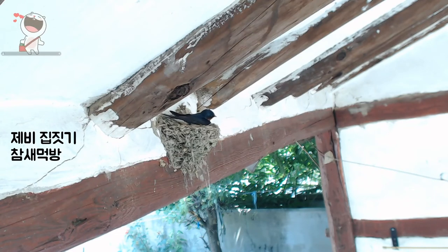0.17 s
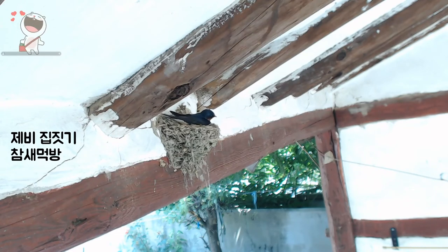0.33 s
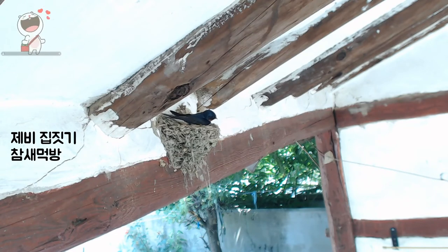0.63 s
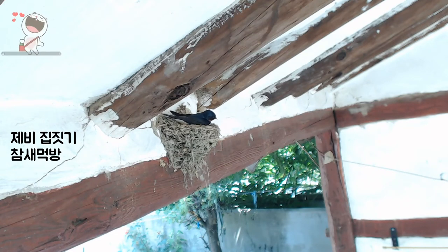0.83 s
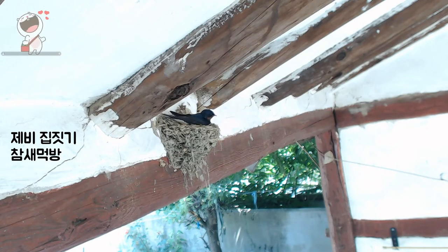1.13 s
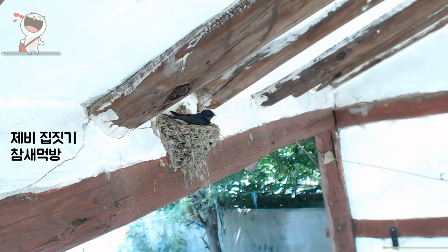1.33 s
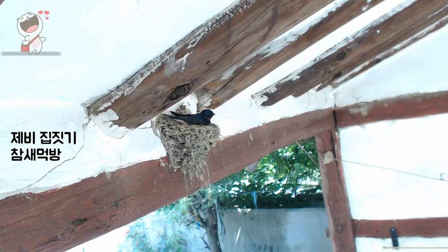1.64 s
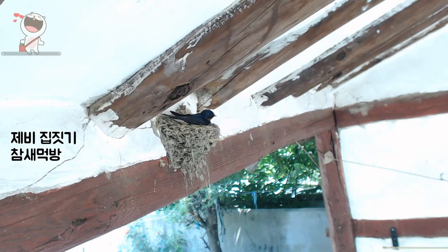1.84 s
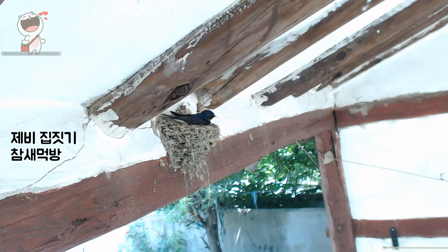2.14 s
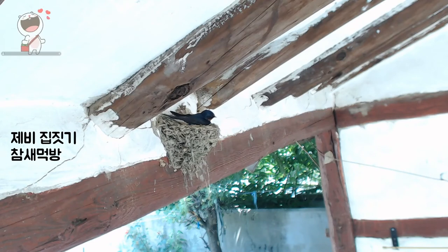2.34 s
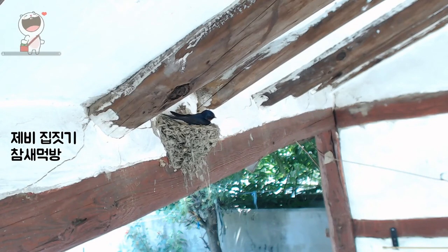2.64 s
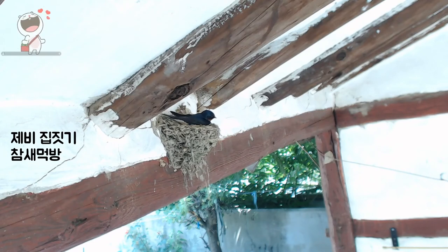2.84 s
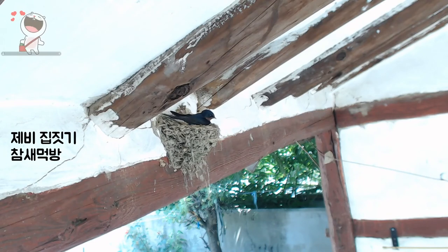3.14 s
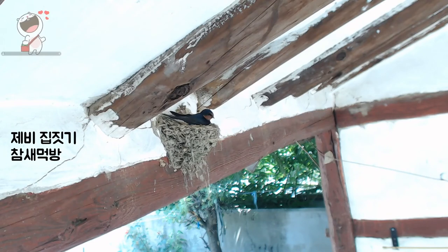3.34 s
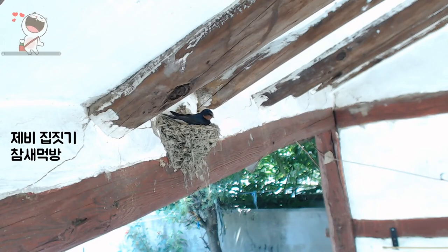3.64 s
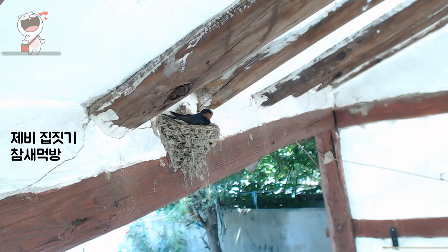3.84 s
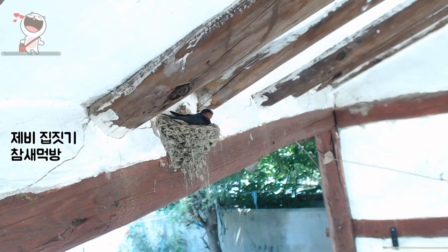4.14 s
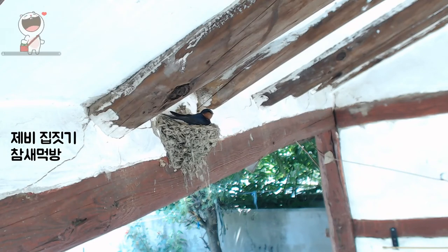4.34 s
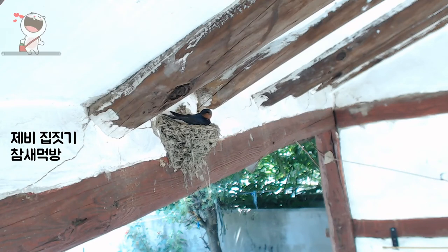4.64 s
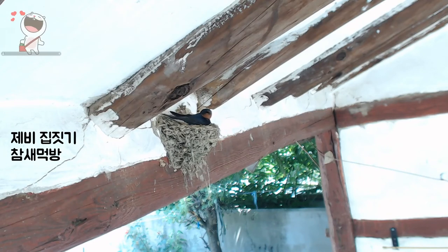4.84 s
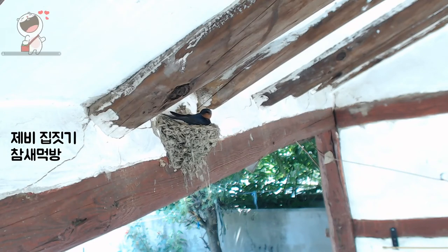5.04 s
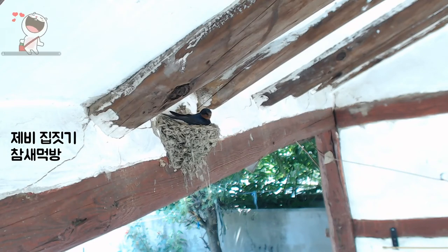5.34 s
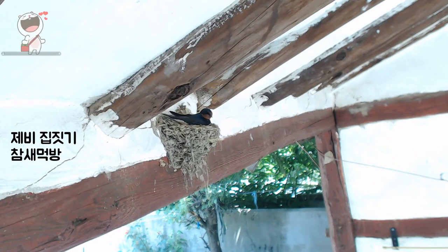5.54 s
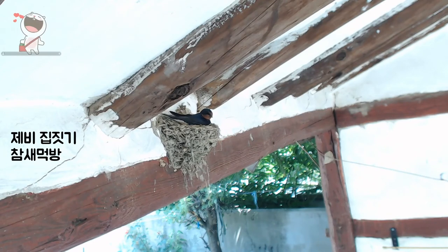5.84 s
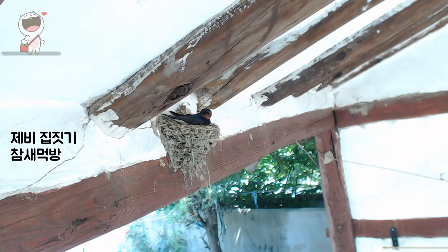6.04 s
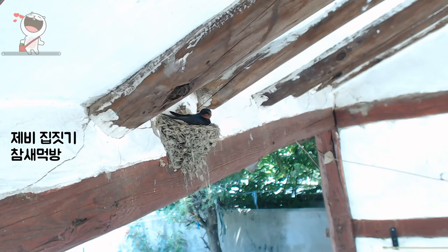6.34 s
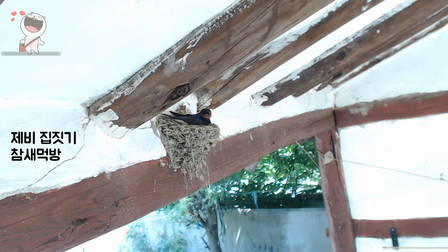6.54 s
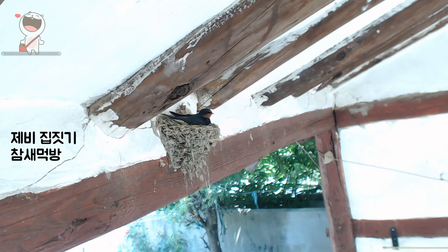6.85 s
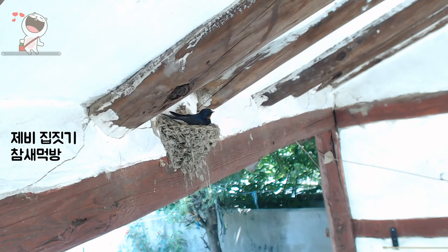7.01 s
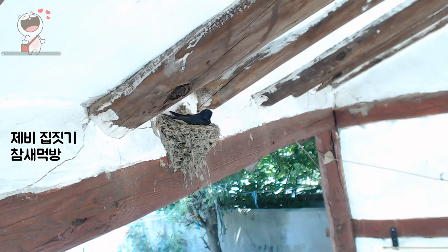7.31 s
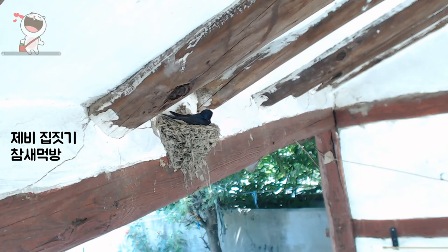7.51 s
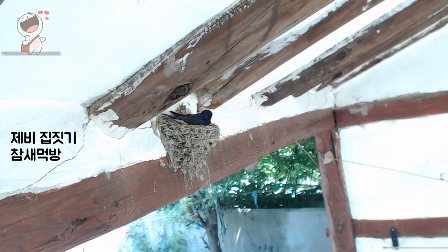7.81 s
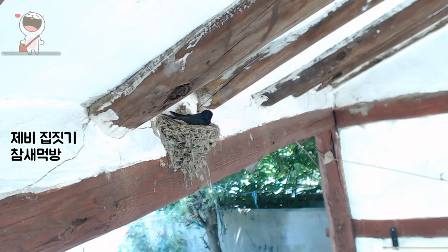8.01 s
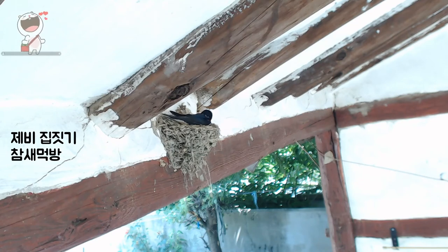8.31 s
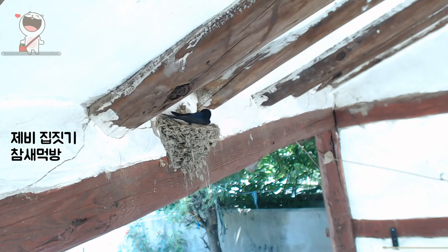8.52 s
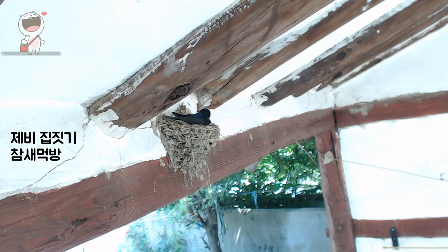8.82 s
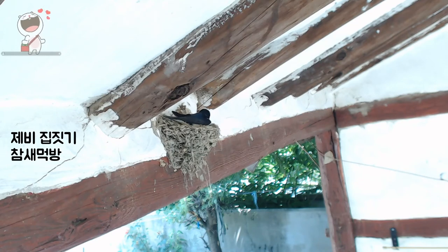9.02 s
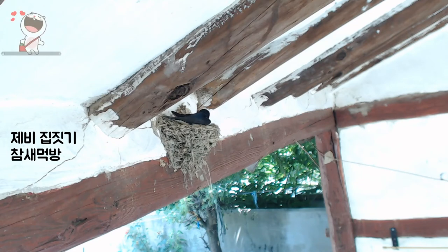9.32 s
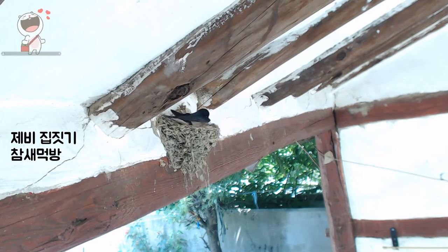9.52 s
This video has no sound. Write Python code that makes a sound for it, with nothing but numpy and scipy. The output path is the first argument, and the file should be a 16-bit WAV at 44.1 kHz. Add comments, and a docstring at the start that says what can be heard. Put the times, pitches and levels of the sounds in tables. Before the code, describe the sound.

Scratchy, squeaky chirps from a small bird close under a roof, one quick flutter, faint distant calls, then sparse dry ticks in near silence.

```python
"""Quiet yard under wooden eaves: small birds chirp in clusters, one bird flutters past.
A chirp is a few rough, overlapping pitch sweeps with overtones, an undertone, rasp and hiss.
Far birds and a thin whistle are pitched voices with echoes; dry ticks are decaying noise bursts.
The flutter is wing pulses over shaped noise; the yard is patchy noise with a low rumble."""
import sys
import numpy as np
from scipy import signal
from scipy.fft import rfft, irfft, next_fast_len
from scipy.io import wavfile
from scipy.ndimage import uniform_filter1d, map_coordinates

SR = 44100
rng = np.random.default_rng(int(sys.argv[2]) if len(sys.argv) > 2 else 0)


def to_wav(sig):
    """Store sig (one row per channel, or 1-D mono) as 16-bit WAV at the path in sys.argv[1].

    Samples outside -1..1 are clipped; the rate is SR.
    """
    pcm = np.clip(np.atleast_2d(sig), -1, 1) * 32767
    pcm = np.round(pcm).astype(np.int16)
    wavfile.write(sys.argv[1], SR, pcm.T)  # frames by channels


N = 426447


def amp(db):
    """Decibels to gain."""
    return 10 ** (np.asarray(db) / 20)


def evened(x):
    """Scales to unit rms."""
    return x / np.sqrt(np.mean(abs(x) ** 2) + 1e-20)


def read(points, hz):
    """Reads a spectrum on a log-frequency axis."""
    point_hz, value = np.transpose(points)
    return np.interp(np.log(hz + 1), np.log(point_hz + 1), value)


def curves(rows):
    """Start time and the columns of a table at every sample."""
    s, *columns = np.transpose(rows)
    t = np.arange(s[0], s[-1], 1 / SR)
    return s[0], [np.interp(t, s, column) for column in columns]


def add(mix, s, sound):
    """Mixes a sound in at a time."""
    part = mix[..., round(s * SR):][..., :sound.shape[-1]]
    part += sound[..., :part.shape[-1]]


def filtered(x, order, hz, kind="lowpass"):
    """Butterworth filter, run forward."""
    return signal.sosfilt(signal.butter(order, hz, kind, fs=SR, output="sos"), x)


def band(count, lo_hz, hi_hz):
    """Unit-rms noise between two frequencies."""
    edges_hz = np.clip([lo_hz, hi_hz], 1, SR / 2 - 1)
    return evened(filtered(rng.standard_normal(count), 2, edges_hz, "bandpass"))


def coloured(count, spectrum):
    """Unit-rms noise with a given spectrum."""
    gain = amp(read(spectrum, np.fft.rfftfreq(count, 1 / SR)))
    return evened(irfft(rfft(rng.standard_normal(count)) * gain, count))


def placed(x, pan_db, lag_ms=0.):
    """One sound at two microphones: left louder by pan_db and later by lag_ms."""
    shift = np.exp(-2j * np.pi * np.fft.rfftfreq(len(x), 1 / SR) * lag_ms / 1000)
    left = irfft(rfft(x) * shift, len(x))
    return np.array([amp(pan_db / 2) * left, amp(-pan_db / 2) * x])


def echoes(x, first_ms, decay_scale):
    """Sparse taps of random sign, other ones for each microphone, each band dying at its own speed."""
    # decay time under the eaves: (frequency [Hz], t60 [s] at decay_scale 1)
    eaves_t60 = [(1500, 0.2), (4000, 0.19), (10000, 0.17)]
    taps, first = np.zeros((2, SR // 2)), round(first_ms * SR / 1000)
    slots = np.arange(first, SR // 2 - 20, 20)
    at = slots + rng.integers(0, 20, (2, len(slots)))  # one tap in every 20 samples
    np.put_along_axis(taps, at, rng.choice([-1., 1.], at.shape), 1)
    hz, t, z = signal.stft(taps, SR, nperseg=256)
    t60_s = decay_scale * read(eaves_t60, hz)[:, None]
    tail = signal.istft(z * amp(-60 * t / t60_s), SR, nperseg=256)[1]
    return signal.oaconvolve(x, tail / np.linalg.norm(tail[0]), axes=1)[:, :N]


def voice(hz, rough):
    """One side of the syrinx as a turning pointer; roughness shakes its pitch and breaks it into throbs."""
    shaken_hz = hz * (1 + 0.12 * rough * band(len(hz), 60, 500))
    throb = amp(4.3 * rough * band(len(hz), 40, 320))
    turns = np.cumsum(shaken_hz) / SR + rng.random()
    return np.sqrt(2) * evened(throb) * np.exp(2j * np.pi * turns)


def yard():
    """Random short-time spectra with drifting patches, partly alike left and right, and a faint hum."""
    # background spectrum: (frequency [Hz], relative density [dB])
    air_spectrum = [(15, -43), (36, -5.5), (60, 0.5), (110, -10), (190, -22), (260, -24), (400, -28.5),
                    (1100, -34), (2500, -39.5), (4500, -37), (6500, -44.5), (9000, -48.5), (11500, -37.5),
                    (16000, -40.5)]
    # left-right likeness: (frequency [Hz], correlation [-1 to 1])
    likeness = [(60, 1), (290, 0.65), (1400, 0), (6800, 0.89), (15000, 0.01)]
    air_db, hum_db = -64, -73.5  # mean of both sides, ahead of the left-right tilt
    frames, hz = N // 256 + 5, np.fft.rfftfreq(1024, 1 / SR)
    a, b, c, d, patches = rng.standard_normal((frames, 513, 5)).T
    patches = evened(uniform_filter1d(uniform_filter1d(patches, 20, 0), 20, 1))
    same = np.clip(read(likeness, hz), -1, 1)[:, None]
    left, other = a + 1j * b, c + 1j * d
    z = np.array([left, same * left + np.sqrt(1 - same ** 2) * other])
    z *= amp(2.0 * patches)
    white = signal.istft(z, nperseg=1024, noverlap=768)[1][:, :N]
    size = next_fast_len(N)
    colour = amp(read(air_spectrum, np.fft.rfftfreq(size, 1 / SR)))
    air = irfft(rfft(white, size) * colour, size)[:, :N]
    hum = amp(hum_db) * band(N, 52, 55)
    return (amp(air_db) * evened(air) + hum) * amp([[1], [-1]])


def far_birds():
    """Rough calls, most of them falling in pitch; high ones are three strands 12 % apart."""
    # far calls: (time [s], level ahead of the echoes [dB], start pitch [Hz], length [s], pitch fall [share])
    far_calls = [(0.019, -66.5, 4770, 0.097, 0.018), (0.125, -66, 4470, 0.2, 0.096),
                 (0.432, -65.5, 4481, 0.064, 0), (0.495, -74, 5660, 0.2, 0.363),
                 (0.774, -75, 4670, 0.066, 0.15), (1.155, -67, 4230, 0.16, 0),
                 (2.834, -67.5, 4574, 0.11, 0), (2.867, -81, 3170, 0.064, 0.07), (3.174, -76, 4670, .12, 0),
                 (4.34, -63.5, 2990, 0.048, 0.18), (6.637, -65, 4810, 0.077, 0.08),
                 (6.681, -75, 3210, 0.051, 0.045), (6.853, -78.5, 4640, 0.094, 0.149),
                 (8.31, -71, 4410, 0.085, 0.018), (8.6, -67.5, 4887, 0.1, 0.33),
                 (8.931, -75.5, 4700, 0.1, 0.024), (9.17, -74, 4296, 0.16, 0.16),
                 (3.189, -75, 1152, 0.036, 0.0061), (3.969, -69, 1160, 0.023, 0.033),
                 (9.63, -71, 4100, .04, 0.04)]
    calls = np.zeros(N)
    for s, db, hz, length_s, fall in far_calls:
        u = np.linspace(0, 1, round(length_s * SR))
        pitch_hz, spread = hz * (1 - fall * u), .12 * (hz > 3400)
        strands = voice(pitch_hz * (1 + spread), 0.48) + voice(pitch_hz, .36)
        strands += voice(pitch_hz * (1 - spread), 0.36)
        add(calls, s, amp(db) * evened(strands.real) * np.sin(np.pi * u) ** 0.5)
    return echoes(np.array([calls, calls]), 0.98, 1.315) * amp([[1.5], [-1.5]])  # echoes only


def sweep(t, crest_s, db, start_hz, crest_hz, end_hz, climb_s, fall_s, lost_db):
    """Pitch, gain and nearness to the crest of one sweep: a quick climb, then a sagging fall."""
    climb_db, swell = 8.5, .6  # level gained in the climb; swell under 1: most of it just before the crest
    attack_db_per_s, release_db_per_s = 2600, 1600  # before the climb, after the fall
    sag = .7  # under 1: the pitch moves fastest just after the crest
    flare_db, flare_s, crest_width_s = 3, 0.0036, .006
    up = np.maximum(crest_s - t, 0) / max(climb_s, 1e-3)
    down = np.maximum(t - crest_s, 0) / max(fall_s, 1e-3)
    hz = crest_hz - (crest_hz - start_hz) * np.minimum(up, 1.3)
    hz -= (crest_hz - end_hz) * np.minimum(down, 2) ** sag
    level_db = db - climb_db * np.minimum(up, 1) ** swell - lost_db * np.minimum(down, 1)
    level_db += flare_db * np.exp(-((t - crest_s) / flare_s) ** 2)
    level_db -= attack_db_per_s * climb_s * np.maximum(up - 1, 0)
    level_db -= release_db_per_s * fall_s * np.maximum(down - 1, 0)
    return np.maximum(hz, 1500), amp(level_db), np.exp(-((t - crest_s) / crest_width_s) ** 2)


def stranded(x):
    """Random ridges and valleys laid over the spectrum of a noise."""
    depth_db, width_hz = 5, 249.2
    z = rfft(x)
    width = max(round(width_hz * len(x) / SR), 1)
    ridges = evened(uniform_filter1d(uniform_filter1d(rng.standard_normal(len(z)), width), width))
    return evened(irfft(z * amp(depth_db * ridges), len(x)))


def throat_noise(main_hz):
    """Rasp: noise read faster or slower, so that its colour and strands partly ride on the main pitch."""
    # noise in a throat tuned to 3.5 kHz: (frequency [Hz], relative density [dB])
    rasp_spectrum = [(2000, -50), (2500, -14), (3500, -3), (4900, -7), (6600, -7.5), (8000, -28),
                     (10000, -39)]
    tuning = uniform_filter1d(main_hz, 300) / 3500
    position = np.cumsum(tuning ** 0.65)
    return map_coordinates(stranded(coloured(2 * len(main_hz), rasp_spectrum)), [position], order=3)


def breath(effort, since_start_s, lead_s):
    """Gain of the air: it swells less than the voices and comes in short puffs."""
    floor_db = -22.5  # air through the whole chirp, against its usual effort
    usual = np.percentile(effort, 85)
    floor = amp(floor_db) * np.minimum(since_start_s / lead_s, 1) ** 2
    puffs = evened(amp(3.4 * band(len(effort), 40, 300).clip(-3, 1.8)))
    return usual * (effort / usual + floor) ** 0.5 * puffs


def chirp(rows, rough, rasp_db, overtone_db, undertone_db, hiss_db, pan_db, lag_ms):
    """The voices share one windpipe: their product adds overtones; the throat follows the loudest pitch."""
    lead_s, trail_s = .03, .02  # air before the first sweep and after the last
    clean_crest = 0.67  # share of the roughness that leaves near the crest
    chatter_hz, chatter = 519.4, 0.8  # beat rate; depth factor at full roughness
    break_db, warble = 7.5, .12  # level break-up and pitch swing at full chatter depth
    third_db = -35  # third overtone against the voices

    start_s = rows[0][0] - rows[0][5] - lead_s
    t = np.arange(start_s, max(row[0] + row[6] for row in rows) + trail_s, 1 / SR)
    hz, gain, crest = np.transpose([sweep(t, *row) for row in rows], (1, 0, 2))
    count, rough = len(t), np.clip(rough * (1 - clean_crest * crest), 0, 1)
    effort = np.linalg.norm(gain, axis=0)
    main_hz = (hz * gain ** 2).sum(0) / effort ** 2

    # away from the crest the voices chatter and break up
    beat_hz = [chatter_hz * (1 + .13 * band(count, 10, 80)) for _ in rows]
    beats = np.cos(2 * np.pi * np.cumsum(beat_hz, axis=1) / SR)
    depth = np.clip(chatter * (1 - crest) * rough ** 0.9, 0, 1)
    breaks = amp(break_db * depth * [band(count, 35, 110).clip(-2.5, 1) for _ in rows])
    swing = depth * beats
    voices = sum(g * (1 + w) * voice(f * (1 + warble * w), r)
                 for f, g, r, w in zip(hz, gain * breaks, rough, swing))

    overtones = filtered((voices ** 2 / effort).real, 3, 8400)
    third = (voices ** 3 / effort ** 2).real
    undertone = voice(main_hz / 2, 0.94).real  # every second cycle is weaker
    hiss = band(count, 9500, 14500)
    hiss = hiss * evened(amp(3.0 * band(count, 15, 90)))  # uneven, in gusts of its own
    noise = amp(rasp_db) * throat_noise(main_hz) + amp(undertone_db) * undertone + amp(hiss_db) * hiss
    sound = voices.real + amp(overtone_db) * overtones + amp(third_db) * third
    sound += breath(effort, t - start_s, lead_s) * noise
    sound = filtered(sound * signal.windows.tukey(count, .2), 4, 1200, "highpass")
    return start_s, placed(sound, pan_db, lag_ms)


def boards(x):
    """Single early reflections off the beams and wall, each at its own delay left and right."""
    taps = np.zeros((2, 1000))
    # (left delay [ms], right delay [ms], level [dB])
    for left_ms, right_ms, db in [(1.1, 1.7, -8.5), (2.6, 2.1, -2.5), (4.3, 5.2, -6), (7.5, 5, -11)]:
        taps[[0, 1], np.round(np.array([left_ms, right_ms]) * SR / 1000).astype(int)] = amp(db)
    return signal.oaconvolve(x, taps, axes=1)[:, :N]


def near_birds():
    """Chirps under the eaves, with board reflections, a short tail and late faint echoes."""
    # one table a chirp, one row a sweep, the two sides of the syrinx taking turns:
    # (crest time [s], relative level [dB], start pitch [Hz], crest pitch [Hz], end pitch [Hz],
    #  climb [s], fall [s], level lost in the fall [dB])
    chirp_sweeps = [
        [(.942, -30, 2910, 3705, 3293, 0.023, 0.021, 4.5), (.967, -28.5, 3084, 3918, 2504, 0.0054, 0.022, 11.5),
         (.977, -32, 3273, 3125, 2990, 0.0051, 0.011, 2.5)],
        [(1.327, -26.5, 3130, 4506, 2980, 0.025, 0.026, 6), (1.357, -25.5, 3310, 4205, 3320, 0.01, 0.024, 6.5),
         (1.363, -27, 3300, 3073, 2752, 0.0081, .037, 7)],
        [(1.45, -45, 3283, 3537, 3400, .015, 0.048, 3.5), (1.477, -41, 4500, 4850, 5050, .01, 0.022, 3.5),
         (1.487, -32.5, 2580, 3150, 2960, 0.013, 0.026, 10.5)],
        [(1.552, -34.5, 4306, 4550, 4310, 0.0078, 0.0084, 8.5),
         (1.56, -35.5, 3380, 3407, 3004, 0.0051, 0.022, 6.5),
         (1.573, -43.5, 5350, 5620, 5973, 0.0071, 0.016, 7.5)],
        [(1.764, -36, 3698, 4010, 3500, .01, 0.0081, 4), (1.78, -27, 3900, 4196, 3200, .005, .02, 13),
         (1.812, -30, 3154, 3795, 3770, .012, 0.025, 8), (1.82, -31.5, 3045, 2647, 2634, 0.024, 0.023, 2)],
        [(1.885, -41, 3700, 3950, 3700, .016, .008, 2), (1.901, -30.5, 2890, 3066, 2960, .012, 0.06, 14.5),
         (1.915, -31, 4320, 4500, 4300, 0.022, 0.017, 11.5), (1.955, -41, 4280, 4539, 4250, 0.013, 0.024, 6.5),
         (1.96, -40, 3540, 3844, 3625, .02, 0.022, 6.5)],
        [(2.046, -40, 2400, 3194, 3300, .018, 0.0027, 2), (2.053, -21.5, 3600, 4954, 4310, .008, .008, 8),
         (2.067, -27, 3700, 4200, 2895, .006, 0.015, 6.5), (2.1, -36, 2650, 3150, 2603, .014, .014, 2.5)],
        [(2.424, -28.5, 3326, 3600, 3580, .012, 0.0061, 5), (2.436, -28, 3496, 4140, 3420, 0.012, 0.025, 3.5),
         (2.464, -30, 3690, 4390, 3780, 0.0049, 0.0053, 8), (2.466, -25, 3420, 3579, 2690, 0.0041, 0.028, 12)],
        [(3.713, -28.5, 4875, 4546, 4443, 0.0097, 0.0125, 4.5), (3.73, -27.5, 4359, 4635, 3350, .004, 0.019, 8),
         (3.74, -36.5, 3304, 3040, 2904, 0.0057, 0.034, 5.5), (3.75, -38, 3500, 3625, 3300, 0.011, 0.018, 6)],
        [(3.933, -34.5, 3300, 4460, 4224, .014, 0.0081, 2.5),
         (3.943, -32.5, 4243, 3908, 3226, 0.0038, 0.019, 6.5), (3.956, -34.5, 3473, 3294, 2745, .008, 0.03, 11)],
        [(4.172, -38, 2700, 3150, 3000, .008, 0.0093, 1.5), (4.189, -26.5, 3200, 4150, 3650, .005, 0.011, 4),
         (4.216, -30, 3300, 3170, 2900, .005, 0.0119, 4.5), (4.237, -31, 2800, 2700, 2450, .014, .014, 5),
         (4.23, -33, 3300, 3870, 2800, 0.00495, 0.012, 3), (4.226, -40, 5300, 5100, 3900, .008, 0.024, 2)],
        [(5.236, -29, 3348, 4050, 4900, .012, .013, 9), (5.213, -48, 3503, 4050, 4200, .012, 0.0073, 2),
         (5.25, -39, 4570, 5400, 4510, 0.019, 0.023, -7), (5.258, -32.5, 4420, 4300, 3750, 0.0027, 0.013, .1),
         (5.28, -28, 3720, 3596, 3325, .01, 0.02, 3.5), (5.284, -31, 4390, 4250, 4120, 0.0085, 0.012, 2)],
        [(5.448, -36, 4100, 4360, 4190, 0.0061, 0.0086, 1.5),
         (5.475, -25.5, 3403, 4100, 3010, .025, 0.015, 6.5), (5.49, -27.5, 4380, 4580, 4200, 0.0054, .006, 6),
         (5.505, -16, 3314, 4340, 3735, 0.0067, 0.0035, 10.5),
         (5.512, -25.5, 3800, 3606, 2608, .004, 0.054, 13)],
        [(5.856, -30, 3487, 3860, 3575, .012, 0.01, 0), (5.871, -26, 3480, 4302, 3484, 0.0051, 0.019, -5),
         (5.901, -24, 3320, 4264, 3196, 0.0055, 0.018, -1), (5.934, -23.5, 3032, 3777, 3000, 0.00456, 0.016, 9),
         (5.945, -32, 2597, 2559, 2490, .02, .014, 5)],
        [(6.148, -31.5, 3277, 3687, 3317, .018, 0.016, 6.5), (6.177, -25, 3357, 4144, 3276, 0.0084, .013, 4.5),
         (6.194, -29, 3533, 4190, 2900, 0.00447, 0.016, 1), (6.232, -33.5, 2550, 2750, 2480, .024, 0.032, 3),
         (6.222, -38, 3300, 3180, 3100, 0.015, 0.0312, 5.5)],
    ]
    # one row a chirp: (roughness away from the crest [0-1], rasp [dB], overtone [dB], undertone [dB],
    #  air hiss [dB], left minus right [dB], left lag [ms])
    manners = [(0.3, -9, -13, -47, -21, 2, -0.054), (0.6, -11, -20.5, -46, -25, 3, 0),
               (0.56, -4, -19.5, -28, -22, 3, 0.22), (0.57, -7, -5.5, -24.5, -18, 5, .2),
               (0.55, -6, -34.5, -22, -27.5, 3.5, .25), (.65, -7.5, -35, -19.5, -29, 4, .25),
               (0.3, -7.5, -15.5, -34, -19.5, 3.5, .2), (0.4, -13, -15, -30, -25, 3, 0.231),
               (0.38, -11, -18, -41.5, -27, 4, -0.068), (0.56, -12, -23.5, -33.5, -34.5, 4, -0.061),
               (0.46, -11, -15.5, -40, -21.5, 3, 0), (0.22, -12, -24.5, -36.5, -29.5, 1.5, .25),
               (.45, -8.5, -19, -41.5, -30.5, 3, 0.28), (0.44, -7, -21, -48, -22.5, 2, 0.2349),
               (0.39, -7, -23.5, -34, -26.5, 2, 0.019)]
    birds = np.zeros((2, N))
    for rows, manner in zip(chirp_sweeps, manners):
        add(birds, *chirp(rows, *manner))
    near = amp(-2.0) * (birds + amp(-4.0) * boards(birds) + amp(-11) * echoes(birds, 8, 1.0))
    return near + amp(-33.5) * echoes(birds, 30, 3.7)  # far walls of the yard


def ticks():
    """Each tick is a sharp bright snap and a duller, scratchy knock, both decaying noise, with echoes."""
    # (time [s], relative snap level [dB], relative knock level [dB])
    tick_rows = [(1.06, -41.5, -78.5), (3.2583, -52.5, -70), (3.6297, -35, -58.5), (4.4897, -47, -63),
                 (4.5309, -40, -63), (5.7682, -42, -80), (6.8559, -47, -69), (7.0397, -74, -63),
                 (7.2924, -46.5, -73), (7.474, -45.5, -58), (7.514, -49, -58.5), (7.5573, -46, -63),
                 (7.6392, -38.5, -81), (8, -65, -51.5), (8.011, -53, -59), (8.0419, -50, -50),
                 (8.1623, -48, -69.5), (8.3996, -37.5, -59), (8.4545, -48, -60), (8.5905, -42, -71.5),
                 (8.9301, -51, -63), (9.182, -58, -57.5), (9.2083, -56, -57)]
    dry_ticks, t = np.zeros((2, N)), np.arange(2500) / SR
    for s, snap_db, knock_db in tick_rows:
        snap = amp(snap_db - 9.0 - 60 * t / 0.017) * band(len(t), 3630, 16000)
        scratch_db = 7.3 * band(len(t), 48, 320)
        knock = amp(knock_db - 8 - 60 * t / 0.036 + scratch_db) * band(len(t), 1550, 5100)
        add(dry_ticks, s, placed(snap + knock, 4.87))
    return dry_ticks + amp(0.0) * echoes(dry_ticks, 3.7, 0.92)


def wings():
    """Each stroke pushes a lump of air and the feathers swish, over stirred air."""
    # wing strokes: (time [s], thrust of air [dB], feather swish [dB], width [ms])
    strokes = [(2.149, -40.5, -85, 2.6), (2.188, -37.5, -72, 3.7), (2.204, -40, -90, 4.5),
               (2.226, -40, -85, 3.2), (2.235, -33.5, -57.5, 1.46), (2.276, -44, -68, 3.3),
               (2.315, -49, -67.5, 1.6)]
    # stirred air: (time [s], relative level [dB])
    flutter = [(2.08, -49.5), (2.232, -43.5), (2.33, -48), (2.41, -58)]
    # (frequency [Hz], relative density [dB])
    air_spectrum = [(30, -4.5), (100, 1.5), (300, -10.5), (1200, -21.0), (2400, -27.5), (16000, -28.0)]
    out, t = np.zeros(N), np.arange(-1000, 1000) / SR
    for s, thrust_db, swish_db, width_ms in strokes:
        u = t * 1000 / width_ms
        push = -amp(thrust_db) * np.sin(2.23 * u) * np.exp(-u ** 2 / 2)
        feathers = band(len(t), 3500, 15500) + amp(9.5) * band(len(t), 270, 930)
        swish = amp(swish_db) * feathers * np.exp(-(t / 0.0038) ** 2)
        add(out, s + t[0], push + swish)
    s, (db,) = curves(flutter)
    air = coloured(len(db), air_spectrum) * signal.windows.tukey(len(db), .45)
    add(out, s, amp(db - 9.0 + 2.7 * band(len(db), 11.7, 70)) * air)
    # the bass reaches both microphones more alike
    low = signal.sosfiltfilt(signal.butter(2, 350, fs=SR, output="sos"), out)
    return placed(low, 1.8) + placed(out - low, 7.5)


def far_whistle():
    """Three clean gliding notes, nearly steady voices, with echoes."""
    # one table a note: (time [s], pitch [Hz], relative level [dB])
    notes = [
        [(7.515, 1900, -84.5), (7.57, 1930, -64.5), (7.6, 1930, -80.5), (7.71, 1917, -85)],
        [(7.695, 1710, -81.5), (7.76, 1877, -74), (7.84, 1952, -63.5), (7.89, 1935, -76.5), (7.99, 1926, -84)],
        [(7.895, 1420, -84), (7.97, 1402, -79.5), (8.03, 1360, -84)],
    ]
    whistle = np.zeros(N)
    for rows in notes:
        s, (hz, db) = curves(rows)
        add(whistle, s, amp(db) * voice(hz, 0.083).real * signal.windows.tukey(len(hz), .2))
    return placed(whistle, 2.6) + amp(-3.5) * echoes(np.array([whistle, whistle]), 4.4, 1.2)


def scene():
    """The yard, far and near birds, ticks, wings and the whistle."""
    return yard() + far_birds() + near_birds() + ticks() + wings() + far_whistle()


def record(dry):
    """The band limit of the recorder: a linear-phase lowpass."""
    edge_hz = 15900
    lowpass = signal.firwin(511, edge_hz, window=("kaiser", 9), fs=SR)
    return signal.oaconvolve(dry, lowpass[None], "same")


dry = scene()
out = record(dry)
to_wav(out)
```